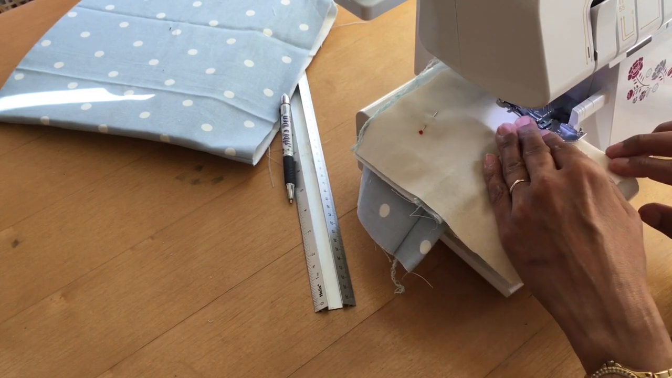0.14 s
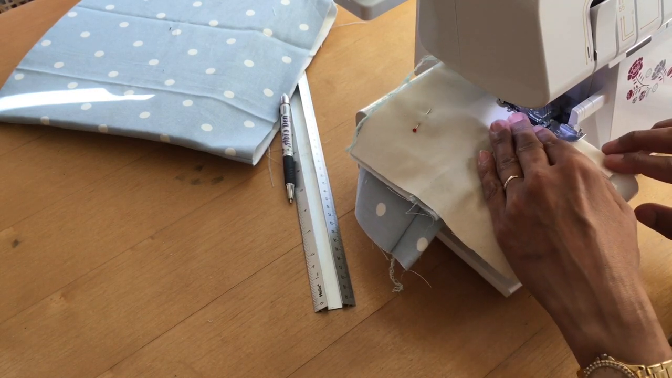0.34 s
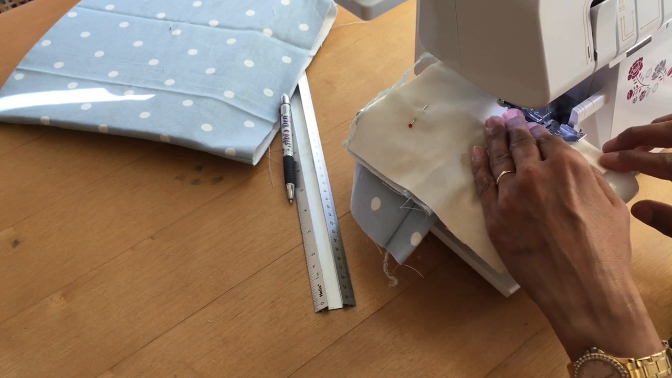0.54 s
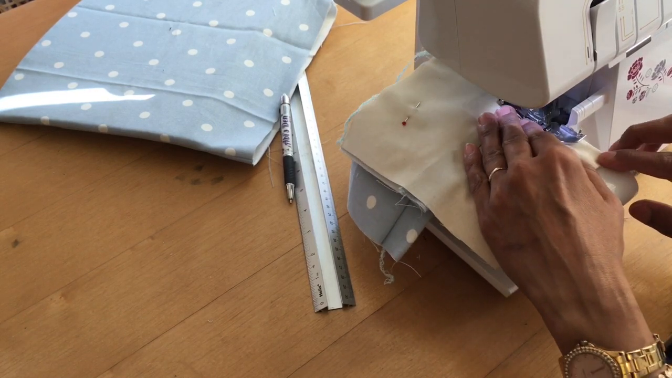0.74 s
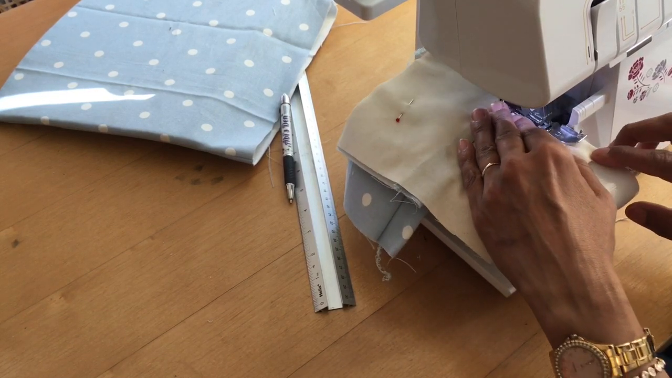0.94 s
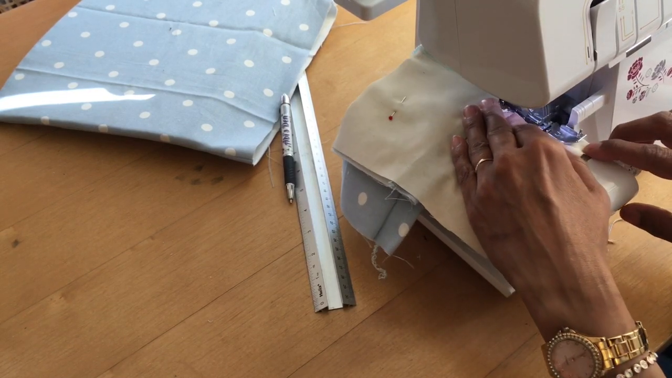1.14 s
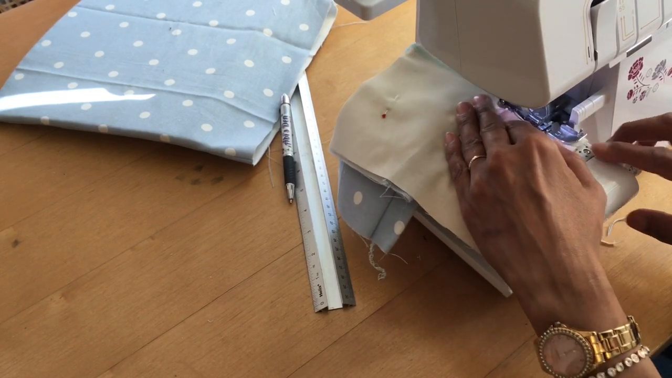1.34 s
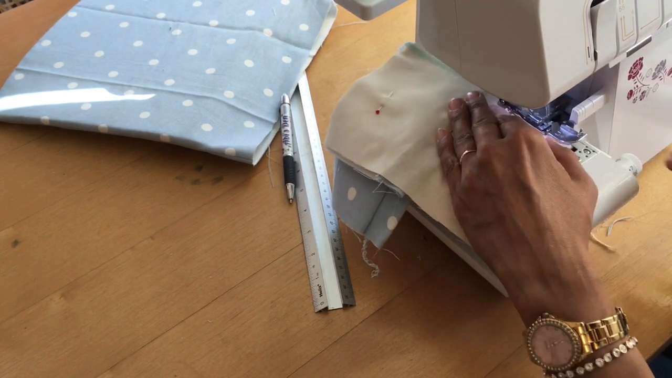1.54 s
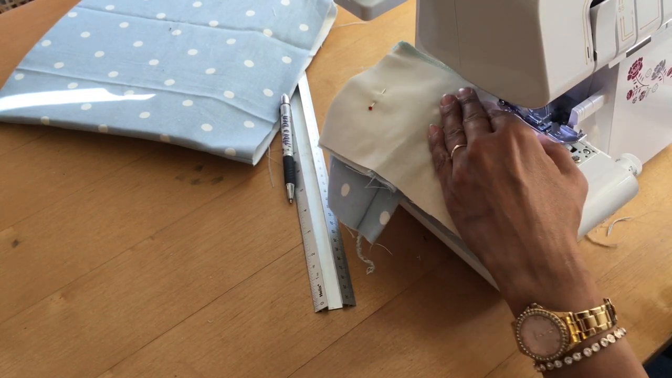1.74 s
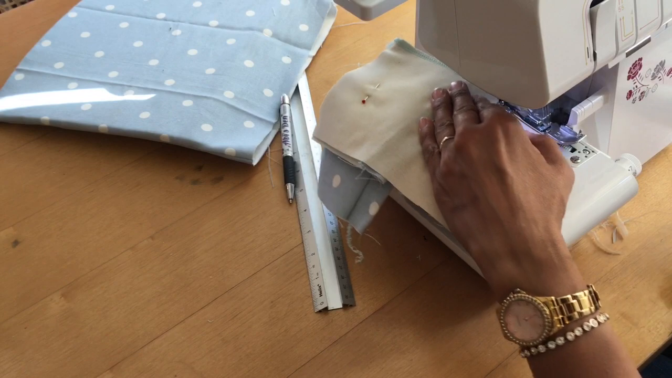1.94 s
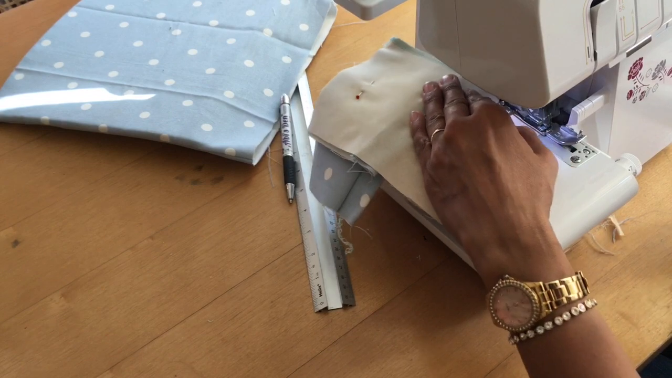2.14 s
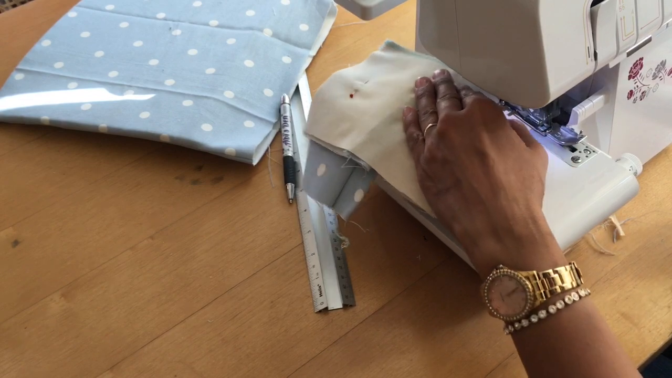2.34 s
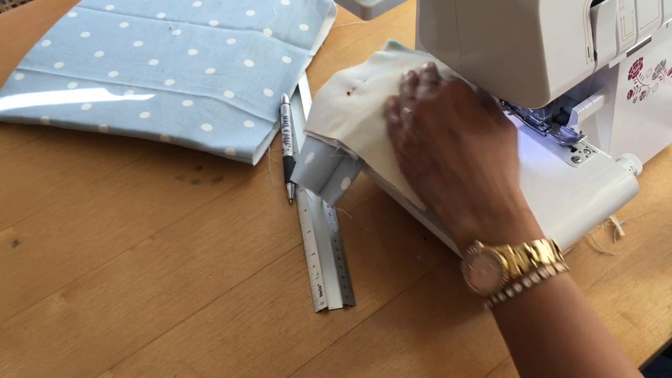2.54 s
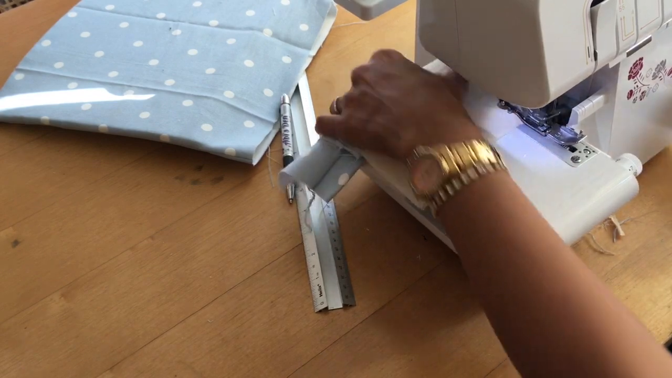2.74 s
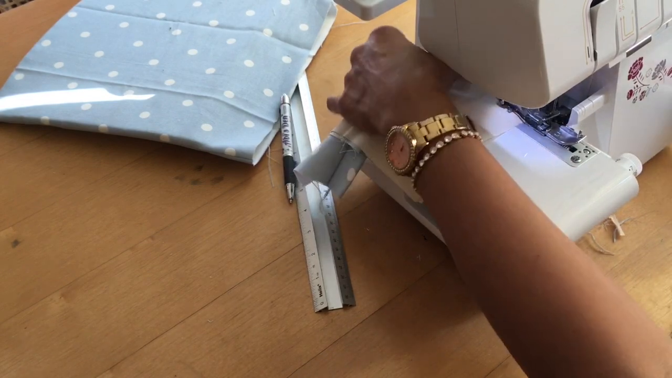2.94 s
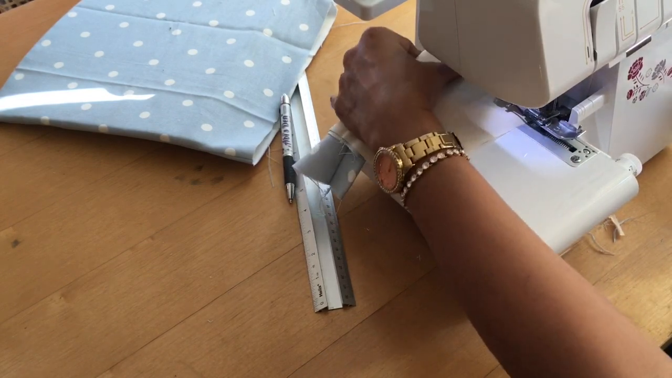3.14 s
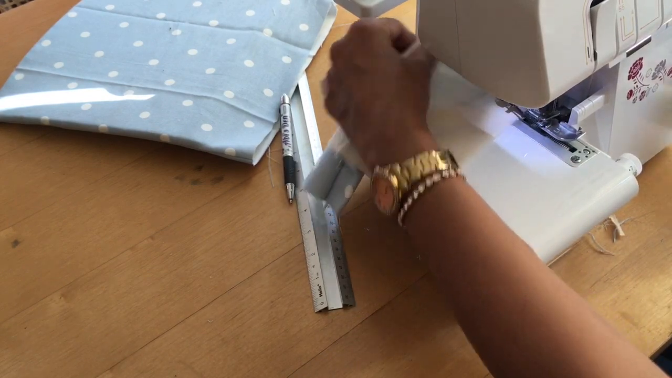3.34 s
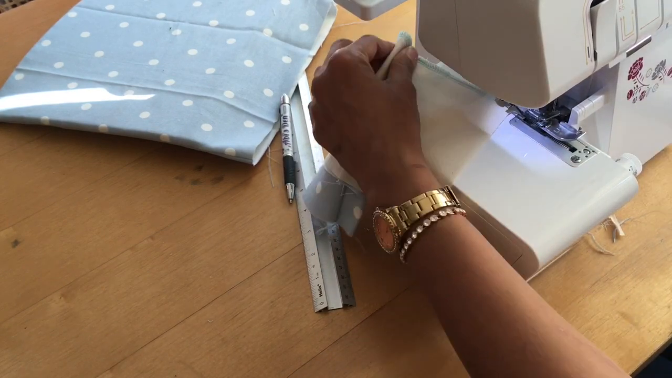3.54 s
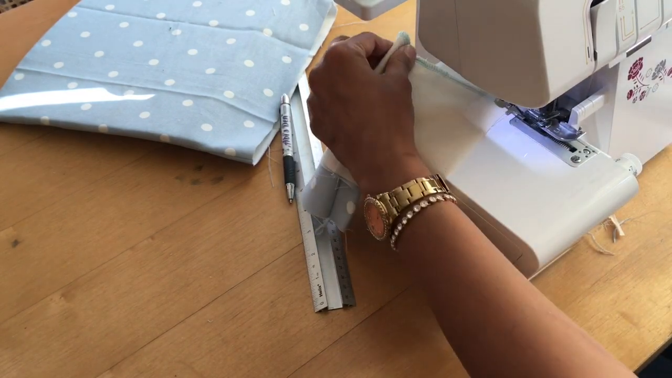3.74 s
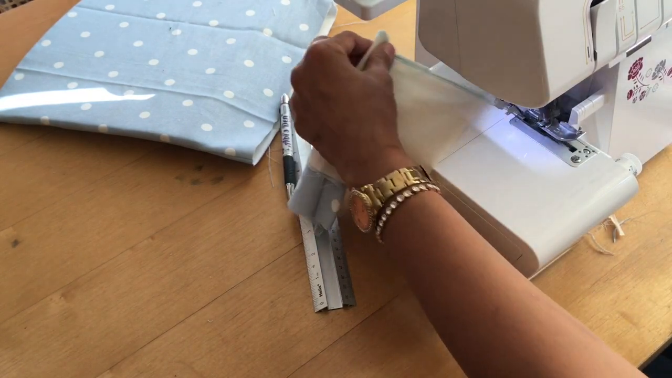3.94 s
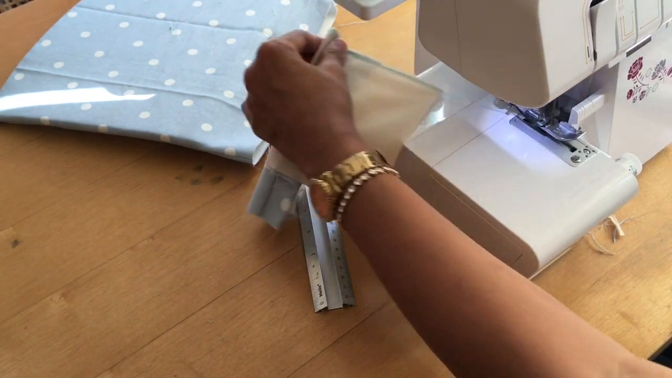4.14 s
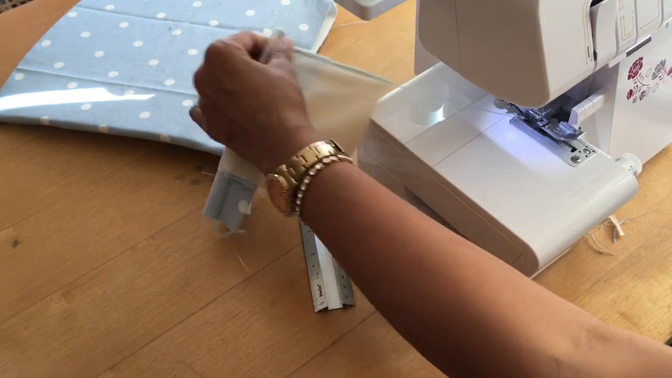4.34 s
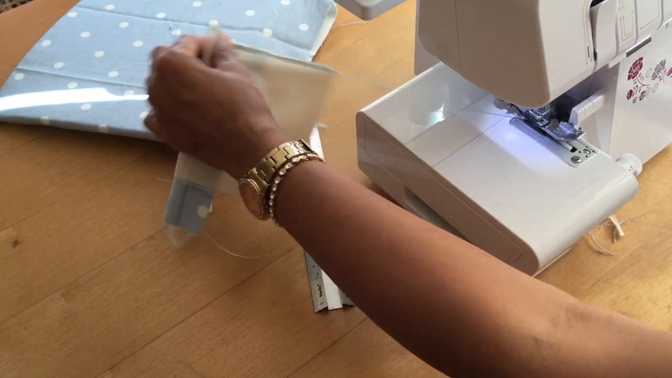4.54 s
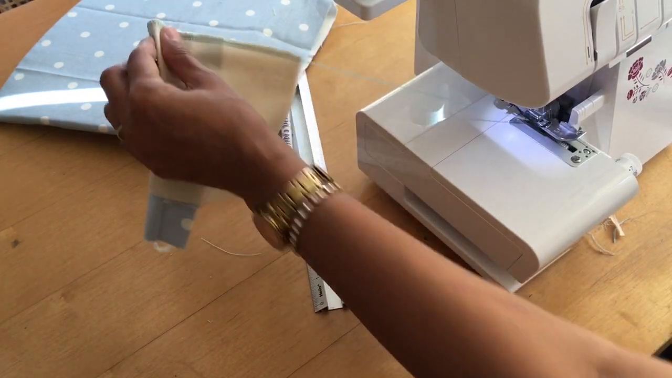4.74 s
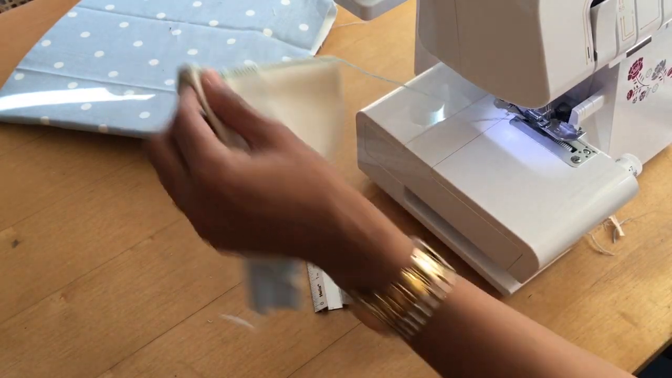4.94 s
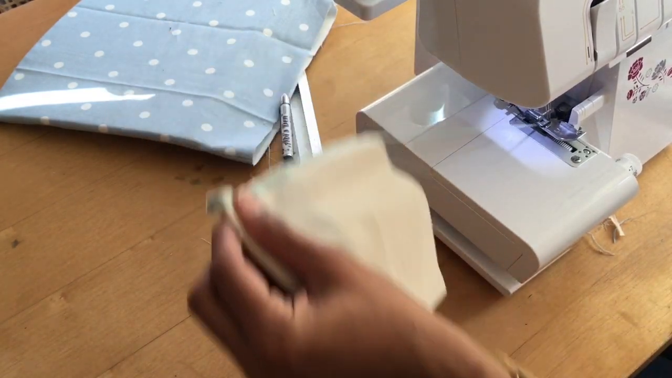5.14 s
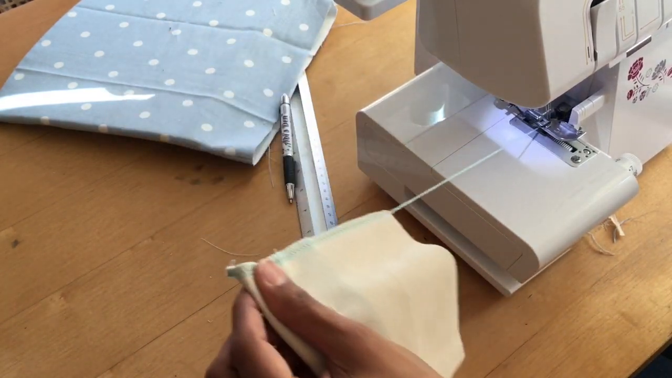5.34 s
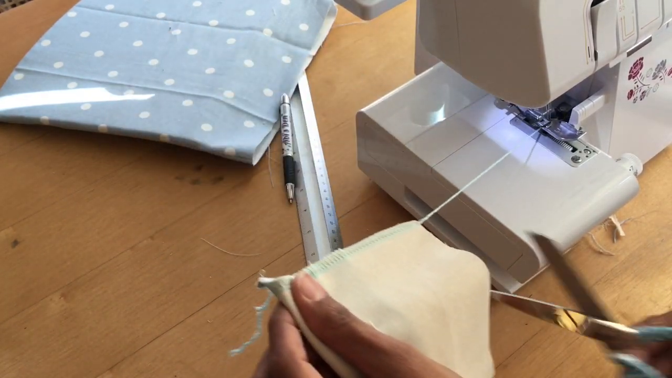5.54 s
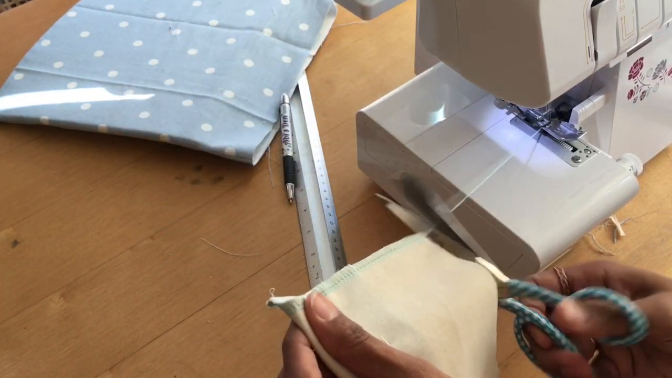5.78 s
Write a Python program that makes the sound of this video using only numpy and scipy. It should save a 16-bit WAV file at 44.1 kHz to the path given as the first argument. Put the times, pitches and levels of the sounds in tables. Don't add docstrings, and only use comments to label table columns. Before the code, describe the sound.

An overlock sewing machine clatters loudly, slows with a squeal, then runs again briefly after knocks on the table; finally scissors clink and slide open.

```python
import sys
import numpy as np
from scipy import signal
from scipy.fft import rfft, irfft, next_fast_len
from scipy.io import wavfile
from scipy.ndimage import uniform_filter1d, map_coordinates

SR = 44100
rng = np.random.default_rng(int(sys.argv[2]) if len(sys.argv) > 2 else 0)


def attenuation_scalar(level_db):
    decades = np.asarray(level_db, float) / 20
    return 10 ** decades


def log_audio(samples):
    frames = np.atleast_2d(samples).T
    limited = np.clip(frames, -1, 1)
    pcm = np.round(limited * 32767).astype(np.int16)
    wavfile.write(sys.argv[1], SR, pcm)


N = 256220

# (frequency [Hz], density [dB/Hz])
AIR_SPECTRUM = [(24, -34), (40, 3.5), (143, -1.5), (220, -13.5), (362, -13.5), (695, -29), (1850, -25.5),
                (6450, -24.5), (7890, -25), (13000, -22), (15900, -24.5)]
AIR_DB = -60.5
# (time [s], level [dB])
DRONE_LEVEL = [
    [(5.3, -87), (5.4, -69.5), (5.7, -64.5), (5.81, -82)],
]
# (frequency [Hz], t60 [s])
ROOM_DECAY = [(200, 0.407), (2000, 0.11), (10000, 0.0897)]
ROOM_DB = -13.5
TOP_HZ = 15960

# (time [s], level [dB])
BUZZ_LEVEL = [
    [(0, -55.5), (1.2, -46.5), (2.45, -50.5), (2.6, -71)],
    [(3.735, -58.5), (3.76, -45), (3.9, -41.5), (4.05, -46.5), (4.6, -42), (4.75, -75)],
]
# (multiple [1], level [dB])
BUZZ_OVERTONES = [(1, 1), (2, -1.5), (3, -4), (4, -11), (6, -11)]
BUZZ_HZ = 101.7

# (frequency
# [Hz], width [Hz], level [dB])
TABLE_MODES = [(65, 45, -13), (95, 30, -31), (127.44, 14.6, 0.5), (153.2, 20.95, -1), (181.8, 24.3, -3)]
# (frequency [Hz], width [Hz], level [dB])
CASING_MODES = [(289.6, 57.4, -0.5), (422.3, 88.2, 0.83), (615.5, 115.2, 2.5), (920, 524, -2.5),
                (1355.4, 272.5, -1), (1580, 298, -3), (2447, 1300, -10.5), (3724, 490, -16.5)]
# (frequency [Hz], density [dB/Hz])
STEEL_SPECTRUM = [(1470, -29.5), (2500, -2), (3710, -1.5), (4010, -2.5), (4540, -2.5), (4980, -5.5),
                  (6180, -3.5), (7330, -8.5), (9390, -6), (10400, -9), (12500, -5.5), (15100, -8),
                  (15900, -13)]
# (frequency [Hz], density [dB/Hz])
BARE_SPECTRUM = [(1500, -7), (3500, 0), (7000, -2), (9000, -1), (12500, -6.5), (15800, 3)]
# (frequency [Hz], density [dB/Hz])
CLOTH_SPECTRUM = [(2000, -19), (5000, -4), (9000, -1.5), (12500, 4), (15800, 0)]

# (time [s], peak [dB], treble [dB], low ring [Hz], high ring [Hz])
RULER_KNOCKS = [(2.914, -40, -13.5, 1220, 2230), (2.939, -39, -0.5, 930, 2220),
                (2.957, -29, -2, 1235, 2900), (3.039, -53.5, -11.5, 1600, 2780),
                (3.072, -49, -0.5, 861, 2440), (3.099, -21, -2.5, 1228, 2352),
                (3.275, -26.5, -10, 1199, 2490), (3.575, -46, -14.5, 851, 5350),
                (3.587, -39.5, -26.5, 690, 2370), (3.662, -34.5, -9.5, 770, 5490),
                (4.93, -25.5, -29, 825, 2650), (4.963, -35.5, -17, 810, 2260), (5.237, -51, -9, 1330, 3070)]
# (time [s], peak [dB], treble [dB], low ring [Hz], high ring [Hz])
PEN_CONTACTS = [
    (2.995, -31.5, 2, 1810, 3756),
    (3.24, -44.5, -1.5, 1100, 4250),
    (3.377, -25.5, -15.5, 1254, 4865),
]
# (frequency [Hz], width [Hz], level [dB])
RULER_MODES = [(526, 272, -7), (810, 141.4, 2.5), (1097, 166, -2.5), (1340.7, 19.3, -0.5), (1730, 880, -13)]
# (frequency [Hz], width [Hz], level [dB])
PEN_MODES = [(2103, 103, -2.5), (2458, 66, 0), (2970, 464, -5.5), (3715, 84, -5), (4260, 760, -14),
             (5530, 590, -9), (6580, 540, -8.5), (8670, 1550, -14), (13350, 4500, -16.5)]
RULER_BASS_DB, PEN_BASS_DB = -13.5, -19
# (time [s], length [s], level [dB])
CLOTH_RUBS = [(3.103, 0.0906, -45), (3.736, 0.0166, -51.5), (5.094, 0.0275, -55), (5.176, 0.0183, -54),
              (5.367, 0.0236, -66), (5.447, 0.0445, -52)]
# (time [s], held [s], scrape [dB], rustle over scrape [dB])
DRAGS = [(2.9, 0.197, -52, -10.5), (3.1, 0.077, -46.5, -8.5), (3.3, 0.107, -56, -12.5),
         (4.98, 0.081, -61, -1.5), (5.4, 0.311, -73, 0.5)]
DRAG_RISE_S, DRAG_FALL_DB_PER_S, BOOM_OVER_DB = 0.0194, 79.5, 1
# (time [s], length [s], frequency [Hz], level [dB])
EDGE_TONES = [(3.108, 0.078, 12050, -51.5), (3.11, 0.058, 5760, -52), (3.66, 0.0108, 9440, -52.5),
              (3.737, .012, 14000, -50.5)]
EDGE_WIDTH_HZ = 800

# (time [s], peak [dB], rise [s], rubbing t60 [s], share of plain scrape [1])
SCISSOR_MOVES = [
    (5.4135, -21, 0.00022, 0.025, 0.22),
    (5.508, -15, 0.0074, 0.1163, 0.173),
    (5.787, -43.5, 0.0153, .15, .2),
]
# (frequency [Hz], width [Hz], level [dB])
CLINK_MODES = [(3500, 300, -40), (6540, 40, -16), (7990, 300, -23), (10020, 250, -25), (11380, 60, 0),
               (14700, 900, -12)]
# (frequency [Hz], width [Hz], level [dB])
BLADE_MODES = [(1150, 80, -24), (1550, 150, -20), (2200, 200, -19), (2600, 150, -14), (3500, 70, -12),
               (4600, 80, -12), (5100, 90, -10), (5650, 70, -6), (6200, 120, -5), (7240, 120, -6),
               (8250, 170, 0), (8750, 130, -3), (10160, 200, -5), (11000, 200, -7), (11900, 220, 0),
               (12950, 170, -3), (14130, 280, -1), (14800, 250, -4), (15450, 300, -1)]
# (frequency [Hz], width [Hz], level [dB])
TOUCH_MODES = [(2900, 100, 5.5), (5745, 150, 5), (8400, 200, -6.5), (9900, 186, -1), (12980, 320, -7.5),
               (15400, 330, -5)]
# (time [s], length [s], frequency [Hz], level [dB])
BLADE_CATCHES = [(5.508, .014, 7164, -38), (5.513, 0.0213, 3466, -44.5), (5.512, .012, 14700, -37),
                 (5.515, 0.0157, 8190, -32.5), (5.515, 0.0062, 6530, -35), (5.516, 0.0078, 5030, -41),
                 (5.516, .022, 11940, -30), (5.518, .01, 13200, -31), (5.523, .022, 4590, -51),
                 (5.527, 0.0176, 6200, -42.5), (5.528, 0.015, 2500, -49), (5.532, 0.019, 8400, -47.5),
                 (5.544, .022, 5050, -54), (5.548, 0.0176, 5670, -46), (5.567, 0.0225, 5910, -59)]
CATCH_WIDTH_HZ = 213

# (time [s], casing rattle [dB])
DRIVE_LEVEL = [
    [(0, -25), (.9, -26), (1.02, -23.5), (1.35, -26), (2.4, -25.5), (2.59, -31), (2.66, -37.5),
     (2.78, -36.5), (2.9, -63.5)],
    [(3.72, -63.5), (3.76, -50), (3.9, -29), (4.1, -29.5), (4.57, -30), (4.69, -32.5), (4.85, -39.5),
     (4.93, -52), (5.16, -83)],
]
STEEL_OVER_DB = -7.5
SLACK_DB, STEEL_FADES = -28, 0.91
# (turn [0-1], level [dB])
TURN_RATTLE = [(.03, 7.5), (.15, 2), (.2, 5), (.3, 1.5), (.45, 4), (.55, -0.5), (.66, 5.5), (.75, -2.5),
               (.96, -2)]
# (turn [0-1], level [dB])
TABLE_PUSHES = [(0.15, -4), (0.332, -4.5), (0.582, -8.5), (0.799, -4)]
# (time [s], width [s], level [dB])
TABLE_ROCKING = [(.25, 0.62, 3.5), (1.15, 0.187, 4), (2.5, 0.076, 0), (3.98, 0.025, 5.5), (4.93, 0.0435, 7)]
THUMP_DB, FULL_DB, THUMP_FOLLOWS = -34.5, -25, 0.549
THUMP_SWAY_DB = 0.47
HEAVE_TURN, HEAVE_DB = 0.287, 2.5

# (time [s], steel tick [dB], casing knock [dB])
NEEDLE_STRIKES = [(0.0014, -17, -21.5), (0.0749, -19, -21.5), (0.155, -23.5, -19.5), (0.2338, -18, -19.5),
                  (0.3155, -19.5, -22), (0.394, -20, -25), (0.471, -24.5, -21), (0.5473, -22.5, -23),
                  (0.6254, -22, -23), (0.7017, -16, -18.5), (0.7754, -16, -24.5), (0.8501, -20.5, -23),
                  (0.9248, -14, -22.5), (0.9949, -14, -18), (1.065, -11.5, -21), (1.1336, -16.5, -24),
                  (1.2, -16.5, -23), (1.2671, -19, -25.5), (1.341, -22.5, -26), (1.4116, -18.5, -21),
                  (1.485, -14.5, -22.5), (1.5508, -14, -19), (1.6246, -17, -22.5), (1.6885, -15, -25),
                  (1.7576, -16.5, -24), (1.8321, -14.5, -25.5), (1.8967, -18, -27.5),
                  (1.9696, -15.5, -24.5), (2.0374, -17.5, -27.5), (2.1062, -12, -23), (2.1657, -15, -28.5),
                  (2.235, -11, -29), (2.305, -10, -29), (2.373, -10.5, -24), (2.4451, -15.5, -21.5),
                  (2.5375, -16.5, -27), (2.6221, -23.5, -36), (2.7003, -23, -38.5), (2.8207, -33, -43.5),
                  (3.7394, -43, -50), (3.8784, -18.5, -31.5), (3.9854, -20, -24), (4.0889, -18, -27.5),
                  (4.1789, -19.5, -30.5), (4.2711, -17.5, -30.5), (4.3632, -15, -21.5),
                  (4.4559, -13.5, -24), (4.5447, -24, -29.5), (4.6492, -18, -26.5), (4.7394, -25.5, -43.5),
                  (4.8534, -29.5, -42.5), (4.9622, -48.5, -51), (5.0669, -44.5, -65)]
CLOTH_LEAVES_S = 2.15
STRIKE_OVER_DB, BARE_OVER_DB = 1.67, 0.26
KNOCK_OVER_DB, BARE_KNOCK_DB = 10.5, -3
# (frequency [Hz], level [dB], t60 [s])
KNOCK_RINGS = [(791, -10.5, 0.05), (1029, -0.5, 0.042), (1344.6, 3, 0.055), (1492, -4, 0.0703),
               (1696.2, -1, 0.0628), (1987.3, -7.5, 0.067), (2824, -12.5, 0.045)]
# (time [s], peak [dB])
STRAY_TICKS = [(0.025, -19), (.1037, -24), (.4973, -31), (.897, -17.5), (1.7275, -16.5), (2.3284, -23),
               (2.4739, -22.5), (2.498, -15.5), (2.5207, -32), (2.5984, -18.5), (2.7477, -47),
               (3.8365, -36.5), (4.902, -35), (3.8486, -27), (3.867, -23.5), (4.0304, -25.5), (5.1125, -44),
               (5.1785, -54.5), (5.2044, -54), (5.3261, -50), (5.6047, -45), (5.658, -51)]
LOOPER_TURN, LOOPER_OVER_DB, PADDED_DB, LOOPER_SCATTER_DB = .64, 5.5, -2, 2.5
# (frequency [Hz], level [dB], t60 [s])
LOOPER_RINGS = [(3025, -1, 0.0185), (3748, -6.5, 0.0186), (5462, -4.5, 0.0207), (8966, 3.5, 0.0116),
                (11410, 4, 0.0121), (12860, 3.5, 0.0148), (15530, -2.5, .012)]
# (time [s], peak [dB], own
# ring [Hz])
BARE_BLOWS = [(2.209, -12.5, 11800), (2.2778, -17, 9230), (2.3462, -18.5, 4520), (2.4161, -14.5, 4490),
              (2.5814, -20.5, 5240), (2.663, -27.5, 5250), (2.6906, -25, 9150), (2.7861, -42, 4760),
              (3.9394, -33, 4470), (3.9394, -31.5, 11100), (4.0048, -25.5, 5880), (4.054, -23, 11000),
              (4.1044, -26, 6400), (4.147, -24.5, 4495), (4.1957, -28, 5570), (4.233, -26, 15400),
              (4.2395, -23, 11600), (4.2874, -24.5, 4520), (4.3313, -23, 10950), (4.3896, -23, 5530),
              (4.4234, -22, 11100), (4.471, -23, 5500), (4.5158, -19, 14400), (4.5527, -24, 11100),
              (4.6105, -22.5, 8900), (4.6711, -23, 5540), (4.8142, -43, 5470)]
# (time [s], level [dB], short second ring [Hz])
PIN_BLOWS = [(0.3242, -22.5, 9280), (0.403, -20.5, 9120), (0.5585, -18.5, 9680), (0.6351, -21.5, 9100),
             (0.7099, -20.5, 9550), (0.7832, -19.5, 9380), (0.9956, -27, 9380), (1.2072, -17.5, 9677),
             (1.485, -16.5, 9690), (1.5539, -23, 9610), (1.6245, -18, 9690), (1.8332, -23.5, 9710),
             (2.044, -20, 9730), (4.4538, -26, 9380)]
PIN_HZ, PIN_T60_S, SECOND_T60_S = 9690, 0.0171, 0.013
# (time [s], peak [dB])
LEVER_CLINKS = [(0.0782, -22.5), (0.1615, -31), (0.3162, -34.5), (0.395, -27.5), (0.4728, -30.5),
                (0.5496, -23.5), (0.5771, -30.5), (0.7023, -31.5), (1.061, -28), (1.1293, -23.5),
                (1.2002, -25.5), (1.273, -28), (1.3384, -23), (1.3593, -26.5), (1.4067, -30),
                (1.4785, -26.5), (1.5464, -25), (1.6152, -29.5), (1.6851, -28.5), (1.7559, -22.5),
                (1.7799, -25.5), (1.8267, -20.5), (1.9669, -21.5), (2.0373, -23.5), (2.1081, -22),
                (2.1784, -27.5), (2.3047, -29), (2.373, -22.5), (2.4074, -29.5), (2.4453, -24.5)]
# (frequency [Hz], level [dB], t60 [s])
LEVER_RINGS = [(3717, 1, 0.02), (6200, -11, .012)]
# (time [s], level [dB], frequency [Hz])
CASING_CLUNKS = [(.111, -15.5, 920), (.347, -18, 1372), (.961, -24.5, 1187), (1.096, -17.5, 1038),
                 (1.417, -22.5, 1574), (2.183, -26.5, 1314), (2.555, -25, 1556), (2.603, -24, 747),
                 (2.693, -39, 1050), (2.712, -39.5, 1410), (3.847, -29.5, 653), (4.370, -20.5, 638),
                 (4.698, -26.5, 639), (4.812, -35.5, 1620), (4.858, -33, 803)]
CLUNK_T60_S = 0.049
# (time [s], length [s], frequency [Hz], level [dB])
BEARING_SQUEALS = [
    (2.7, 0.028, 1443, -52.5),
    (2.738, 0.0675, 1325, -43.5),
    (2.747, 0.095, 1700, -48),
    (3.768, 0.047, 1553, -65),
    (3.853, 0.043, 2660, -39),
]
SQUEAL_WIDTH_HZ = 106


def unit(x):
    return x / np.sqrt(np.mean(x ** 2) + 1e-20)


def along(points, hz):
    f, v = np.transpose(points)
    return np.interp(np.log(hz + 1), np.log(f + 1), v)


def curve_db(spans):
    t = np.arange(N) / SR
    each = []
    for span in spans:
        s, db = np.transpose(span)
        each.append(np.interp(t, s, db, left=-120, right=-120))
    return uniform_filter1d(np.max(each, axis=0), size=400)


def filtered(x, response):
    m = next_fast_len(len(x) + 8192)
    return irfft(rfft(x, m) * response(np.fft.rfftfreq(m, 1 / SR)), m)[:len(x)]


def body(modes):
    def response(f):
        total = 0
        for k, (center, width, db) in enumerate(modes):
            damping = 1j * f * width
            total = total + (-1) ** k * attenuation_scalar(db) * damping / (center * center - f * f + damping)
        return total
    return response


def colour(spectrum):
    return lambda hz: attenuation_scalar(along(spectrum, hz))


def wander(t, rate_hz, points):
    return map_coordinates(rng.standard_normal(points), [t * rate_hz])


def grit(per_second, scatter_db, smooth):
    chance, size, noise = rng.random(N), rng.standard_normal((2, N)), rng.standard_normal(N)
    impacts = (chance < per_second / SR) * size[0] * attenuation_scalar(scatter_db * size[1])
    return unit(impacts) + smooth * noise


def bursts(events, t60, rise):
    starts, t = np.zeros(N), np.arange(SR // 10) / SR
    for s, db in events:
        starts[max(round(s * SR), 0)] = attenuation_scalar(db)
    shape = attenuation_scalar(-60 * t / t60) * (1 - np.exp(-t / rise))
    return signal.fftconvolve(starts, shape)[:N] * rng.standard_normal(N)


def add(track, s, sound):
    part = track[round(s * SR):][:len(sound)]
    part += sound[:len(part)]


def ring(modes, t, spread_db):
    total = np.zeros(len(t))
    for hz, db, t60 in modes:
        decay = attenuation_scalar(db + spread_db * rng.normal() - 60 * t / t60)
        total += decay * np.sin(2 * np.pi * (hz * t + rng.random()))
    return total


def friction(rows, width_hz):
    out, t = np.zeros(N), np.arange(SR // 8) / SR
    for s, length, hz, db in rows:
        tone = unit(filtered(rng.standard_normal(len(t)), lambda f: body([(hz, width_hz, 0)])(f) ** 2))
        add(out, s, attenuation_scalar(db) * tone * np.sin(np.pi * np.clip(t / length, 0, 1)) ** .5)
    return out


def room_air():
    return attenuation_scalar(AIR_DB) * unit(filtered(rng.standard_normal(N), colour(AIR_SPECTRUM)))


def far_drone():
    tone = filtered(rng.standard_normal(N), lambda f: body([(350, 110, 0)])(f) ** 2)
    return attenuation_scalar(curve_db(DRONE_LEVEL)) * unit(tone)


def room(x):
    _, t, z = signal.stft(rng.standard_normal(SR // 2), SR, nperseg=256)
    hz = np.fft.rfftfreq(256, 1 / SR)
    tail = signal.istft(z * attenuation_scalar(-60 * t / along(ROOM_DECAY, hz)[:, None]), SR, nperseg=256)[1]
    delayed = np.pad(x, (300, 0))
    return signal.fftconvolve(delayed, tail / np.linalg.norm(tail))[:N]


def motor():
    t, lines = np.arange(N) / SR, np.zeros(N)
    for k, db in BUZZ_OVERTONES:
        level = attenuation_scalar(db + 5.34 * wander(t, 12, 100))
        lines += level * np.sin(2 * np.pi * k * BUZZ_HZ * t + 0.99 * wander(t, 12, 100))
    return attenuation_scalar(curve_db(BUZZ_LEVEL)) * lines


def ruler_and_pen():
    out, t = np.zeros(N), np.arange(SR // 4) / SR
    contacts = [(*row, RULER_BASS_DB) for row in RULER_KNOCKS]
    contacts += [(*row, PEN_BASS_DB) for row in PEN_CONTACTS]
    for s, db, treble_db, low_hz, high_hz, bass_db in contacts:
        shake = rng.standard_normal((3, len(t))) * attenuation_scalar(-60 * t / np.c_[[.08, .045, .2]])
        wood = filtered(shake[0], body(RULER_MODES + [(low_hz, 120, 1.5)]))
        snap = filtered(shake[1], body([(high_hz, 110, .6)] + PEN_MODES))
        boom = filtered(shake[2], body(TABLE_MODES + CASING_MODES[:2]))
        parts = zip((wood, snap, boom), (db - 1.5, db + treble_db + 5.5, db + bass_db + 2.5))
        add(out, s, sum(attenuation_scalar(level) * part / np.abs(part).max() for part, level in parts))
    return out + friction(EDGE_TONES, EDGE_WIDTH_HZ)


def cloth_rubs():
    out, t = np.zeros(N), np.arange(SR // 4) / SR
    for s, length, db in CLOTH_RUBS:
        stroke = np.clip(t / .003, 0, 1) * np.clip(1 - t / length, 0, 1) ** 0.45
        add(out, s, attenuation_scalar(db) * stroke * unit(filtered(rng.standard_normal(len(t)), colour(CLOTH_SPECTRUM))))
    return out


def drags():
    start, held, scrape_db, rustle_db = np.transpose(DRAGS)[:, :, None]
    since = np.arange(N) / SR - start
    fall_db = DRAG_FALL_DB_PER_S * np.maximum(since - held, 0)
    press = np.clip(since / DRAG_RISE_S, 0, 1) * attenuation_scalar(scrape_db - fall_db)
    boom = unit(filtered(rng.standard_normal(N), body([(50, 23, -3.0)] + TABLE_MODES[1:])))
    scrape = unit(filtered(grit(400, scatter_db=3, smooth=1.5), body(CASING_MODES[:7])))
    rustle = unit(filtered(grit(3000, scatter_db=2, smooth=1.5), colour(STEEL_SPECTRUM)))
    low = press.max(axis=0) * (attenuation_scalar(BOOM_OVER_DB) * boom + scrape)
    return low + (press * attenuation_scalar(rustle_db)).max(axis=0) * rustle


def scissors():
    out, t = np.zeros(N), np.arange(SR // 4) / SR

    def rub(rise, t60, slow):
        swell = 1 - np.exp(-(t / (rise * slow)) ** 2)
        catch = attenuation_scalar(4 * wander(t, 130, 60))
        return catch * rng.standard_normal(len(t)) * swell * attenuation_scalar(-60 * t / (t60 * slow ** 0.304))

    def blade(mode):
        return lambda f: body([mode])(f) * f ** 4 / (f ** 4 + (0.54 * mode[0]) ** 4)

    for (s, db, rise, t60, scrape), modes in zip(SCISSOR_MOVES, (CLINK_MODES, BLADE_MODES, TOUCH_MODES)):
        tone = np.zeros(len(t))
        for mode in modes:
            slow = max(1, 7000 / mode[0]) ** 0.71
            tone += filtered(rub(rise, t60, slow), blade(mode))
        hiss = filtered(rub(rise, t60, 0.9), colour(CLOTH_SPECTRUM))
        add(out, s, attenuation_scalar(db) * (tone / np.abs(tone).max() + scrape * hiss / np.abs(hiss).max()))
    return out + friction(BLADE_CATCHES, CATCH_WIDTH_HZ)


def table_thump(casing_db, turns):
    t = np.arange(N) / SR
    rocking_db = sum(db * np.exp(-((t - s) / width) ** 2) for s, width, db in TABLE_ROCKING)
    sway_db = THUMP_SWAY_DB * wander(t, 14, 100)
    running_db = THUMP_DB + THUMP_FOLLOWS * (casing_db - FULL_DB) + rocking_db + sway_db
    thump_db = np.where(casing_db > -90, running_db, -120)
    heave_db = HEAVE_DB * np.cos(2 * np.pi * (turns - HEAVE_TURN))
    pushes = sum(attenuation_scalar(db) * np.diff(np.floor(turns - at), prepend=-1) for at, db in TABLE_PUSHES)
    force = unit(pushes) + 0.516 * rng.standard_normal(N)
    thump = filtered(force, lambda f: body(TABLE_MODES)(f) * f ** 8 / (f ** 8 + 39.5 ** 8))
    return attenuation_scalar(thump_db + heave_db) * unit(thump)


def gear_rattle(casing_db, gate_db, bright):
    gears = attenuation_scalar(0.552 * gate_db) * grit(1200, scatter_db=3.0, smooth=1.523)
    low, high = filtered(gears, body(CASING_MODES[:6])), filtered(gears, body(CASING_MODES[6:]))
    return attenuation_scalar(casing_db - 1.52) * (low + bright * high) / np.std(low + high)


def steel_rattle(steel_db, gate_db):
    steel = attenuation_scalar(gate_db) * filtered(grit(5000, scatter_db=1.5, smooth=1.5), colour(STEEL_SPECTRUM))
    return attenuation_scalar(steel_db + 0.6666) * unit(steel)


def loose_parts(level, per_second, spread_db):
    draws = rng.random((round(per_second * N / SR), 4))
    near_hz = np.array([620, 850, 1300, 1420, 1550, 1700, 2350, 2750, 3350, 3690, 4550, 6300, 9100, 11500])
    hz = near_hz[(draws[:, 0] * len(near_hz)).astype(int)] * (.95 + 0.0994 * draws[:, 1])
    start, t = (draws[:, 2] * N).astype(int), np.arange(560) / SR
    size = level[start] * attenuation_scalar(-spread_db * np.log(draws[:, 3] + 0.0017)) * (1000 / hz) ** 0.338
    shape = attenuation_scalar(-60 * t / 0.01665) * (1 - np.exp(-t / 0.0008))
    rows = size[:, None] * np.sin(2 * np.pi * hz[:, None] * t) * shape
    places = start[:, None] + np.arange(len(t))
    return np.bincount(places.ravel(), rows.ravel(), N + len(t))[:N]


def steel_ticks(strike_s, strike_db, looper_s, looper_db):
    looper = np.c_[looper_s, looper_db][looper_s < CLOTH_LEAVES_S]
    contacts = np.r_[np.c_[strike_s, strike_db], looper, STRAY_TICKS]
    padded = contacts[:, 0] < CLOTH_LEAVES_S
    soft = bursts(contacts[padded] - [.002, 0], t60=0.055, rise=0.00355)
    ticks = filtered(soft, colour(STEEL_SPECTRUM)) * attenuation_scalar(-1.0)
    bare = np.r_[contacts[~padded], np.array(BARE_BLOWS)[:, :2] + [0, -1.8]]
    slack = bare - [.007, 14]
    hard = bursts(np.r_[bare, slack], t60=0.0218, rise=0.00173)
    ticks += filtered(hard, colour(BARE_SPECTRUM)) * attenuation_scalar(0.5)
    t = np.arange(SR // 40) / SR
    for s, db in bare:
        add(ticks, s, attenuation_scalar(db - 9) * ring(LOOPER_RINGS, t, spread_db=4.0) * (1 - np.exp(-t / 0.00176)))
    for s, db, hz in BARE_BLOWS:
        add(ticks, s, attenuation_scalar(db - 2) * ring([(hz, 0, .016)], t, spread_db=1) * (1 - np.exp(-t / 0.00133)))
    return ticks


def pin_lever_and_clunks():
    rings, t = np.zeros(N), np.arange(SR // 14) / SR
    for s, db, hz in PIN_BLOWS:
        pin = ring([(PIN_HZ, 5, PIN_T60_S), (hz, 5, SECOND_T60_S)], t, spread_db=1.5)
        add(rings, s, attenuation_scalar(db) * pin * (1 - np.exp(-(t / .0015) ** 2)))
    clinks = [(s, db + 5.5, LEVER_RINGS) for s, db in LEVER_CLINKS]
    clinks += [(s, db, [(hz, 0, CLUNK_T60_S)]) for s, db, hz in CASING_CLUNKS]
    for s, db, modes in clinks:
        add(rings, s, attenuation_scalar(db) * ring(modes, t, spread_db=0) * (1 - np.exp(-t / 0.0021)))
    return rings


def casing_knocks(strike_s, knocks_db):
    out, t = np.zeros(N), np.arange(SR // 14) / SR
    for s, db in zip(strike_s, knocks_db):
        rattle = attenuation_scalar(2.3 * wander(t, 400, 60)) * (1 - np.exp(-(t / 0.00691) ** 2))
        add(out, max(s - .002, 0), rattle * attenuation_scalar(db - 9) * ring(KNOCK_RINGS, t, spread_db=3.0))
    return out


def machine():
    clock, casing_db = np.arange(N) / SR, curve_db(DRIVE_LEVEL)
    steel_db = casing_db + STEEL_OVER_DB - STEEL_FADES * np.maximum(SLACK_DB - casing_db, 0)
    bright = attenuation_scalar(np.clip(0.66 * (steel_db - casing_db + 7.0), -30, 3))

    strike_s, strike_db, knocks_db = np.transpose(NEEDLE_STRIKES)
    whole = np.arange(len(strike_s))
    turns = np.interp(clock, strike_s, whole)
    gate_db = np.interp(turns, *np.transpose(TURN_RATTLE), period=1)
    strike_db = strike_db + np.where(strike_s < CLOTH_LEAVES_S, STRIKE_OVER_DB, BARE_OVER_DB)
    knocks_db = knocks_db + KNOCK_OVER_DB + BARE_KNOCK_DB * (strike_s > CLOTH_LEAVES_S)

    looper_s = np.interp(whole + LOOPER_TURN, whole, strike_s)
    looper_db = np.interp(looper_s, clock, steel_db - STEEL_OVER_DB) + LOOPER_OVER_DB + PADDED_DB
    looper_db += LOOPER_SCATTER_DB * rng.standard_normal(len(whole))

    out = table_thump(casing_db, turns)
    out += gear_rattle(casing_db, gate_db, bright) + steel_rattle(steel_db, gate_db)
    out += loose_parts(bright * attenuation_scalar(casing_db + 0.61 * gate_db - 5), 700, spread_db=3)
    out += steel_ticks(strike_s, strike_db, looper_s, looper_db)
    out += pin_lever_and_clunks() + casing_knocks(strike_s, knocks_db)
    return out + friction(BEARING_SQUEALS, SQUEAL_WIDTH_HZ)


def scene():
    handling = ruler_and_pen() + cloth_rubs() + drags()
    near = motor() + handling + scissors() + machine()
    return (room_air() + far_drone() + attenuation_scalar(ROOM_DB) * room(near) + near)[None]


def band_limit(x):
    return signal.sosfilt(signal.butter(12, 16990, fs=SR, output="sos"), x)


def record(dry):
    kept = filtered(dry[0], lambda hz: 1 / (1 + (hz / TOP_HZ) ** 300))
    return band_limit(kept[None])


dry = scene()
out = record(dry)
log_audio(out)
```